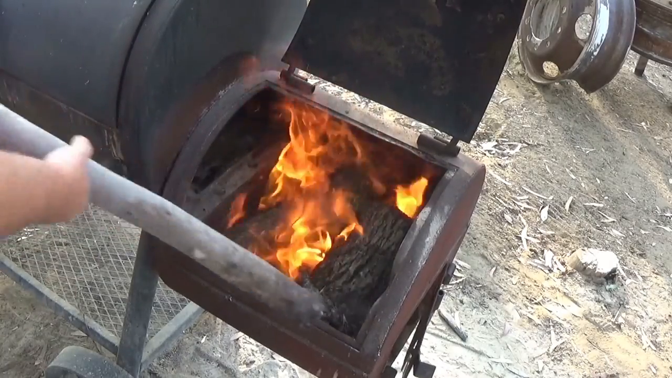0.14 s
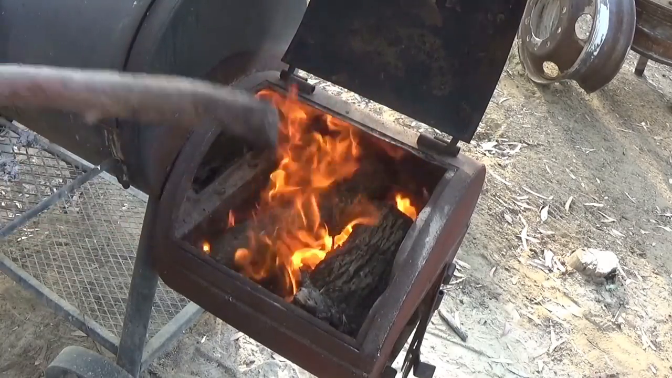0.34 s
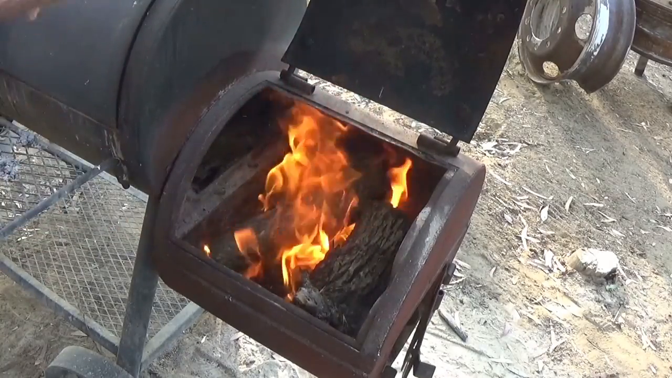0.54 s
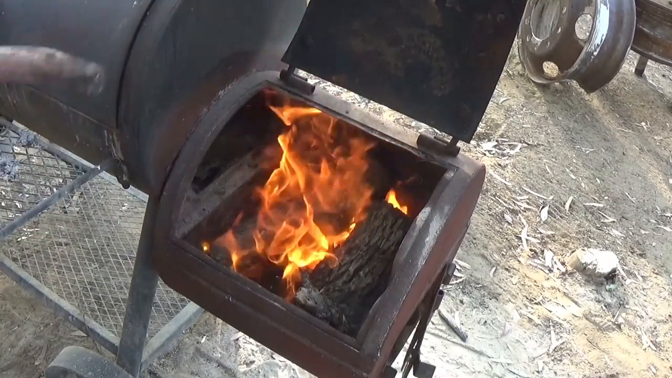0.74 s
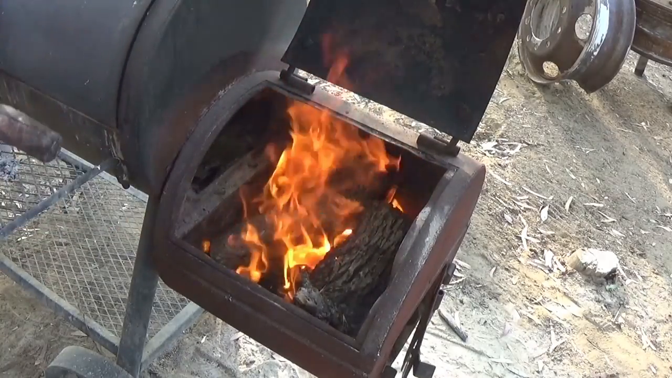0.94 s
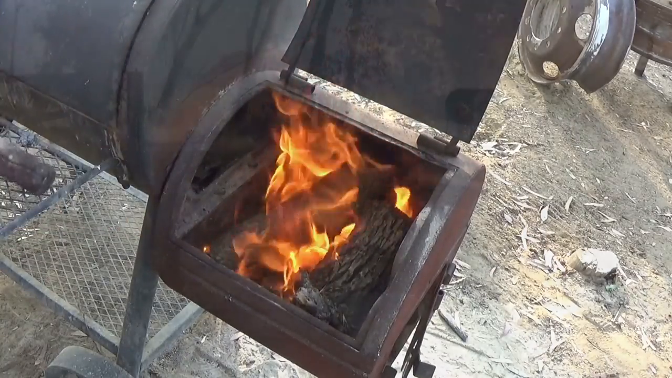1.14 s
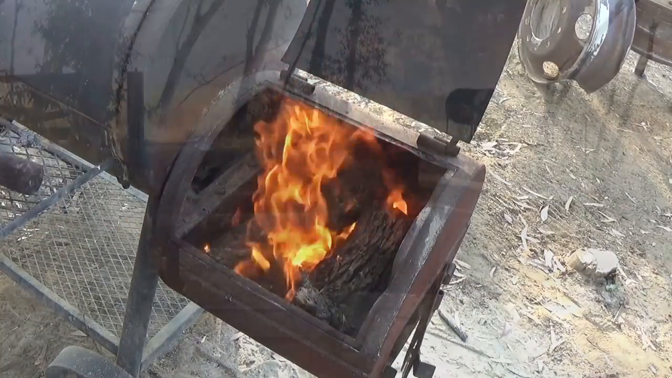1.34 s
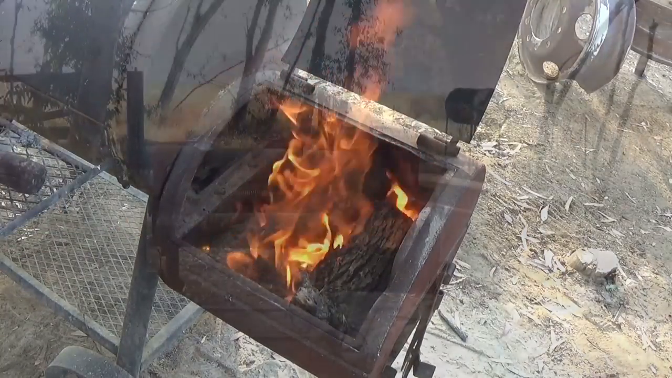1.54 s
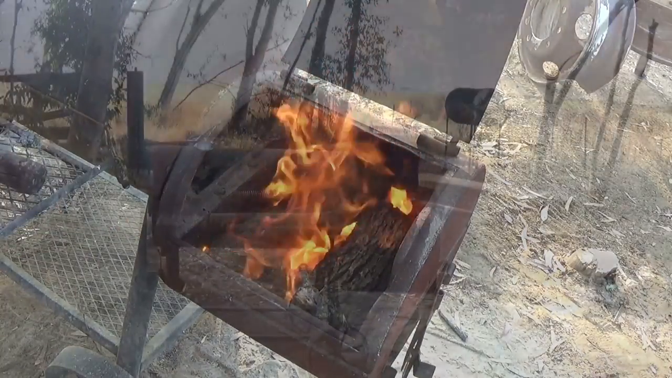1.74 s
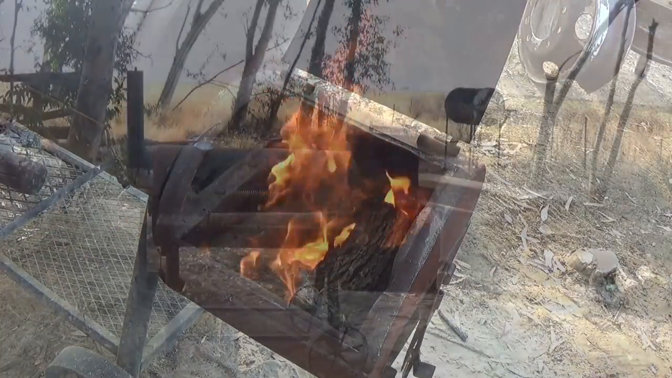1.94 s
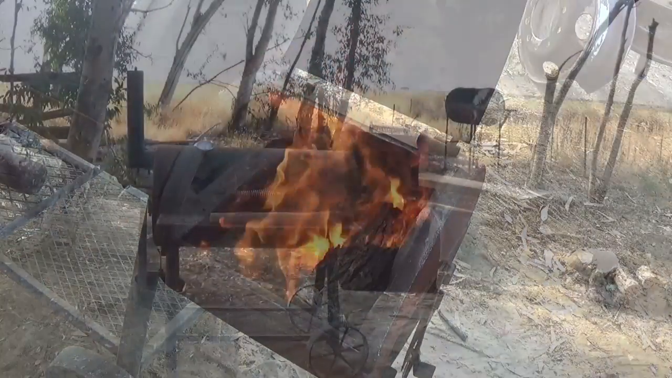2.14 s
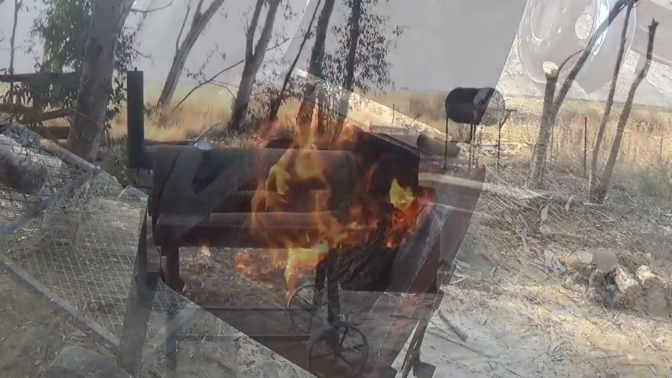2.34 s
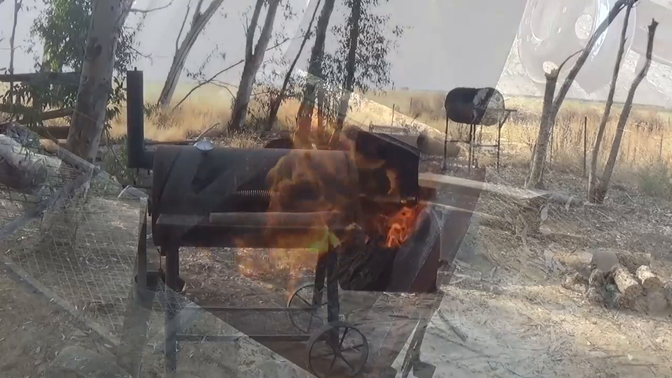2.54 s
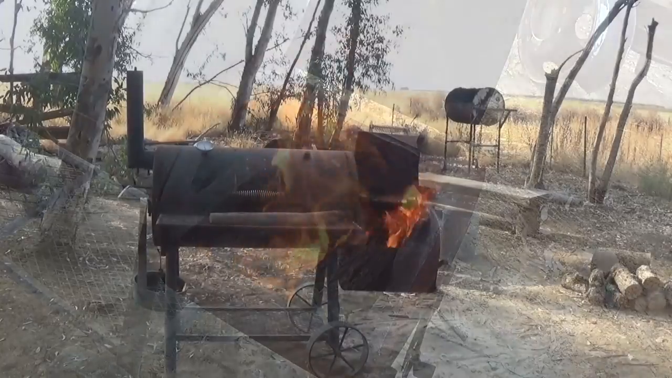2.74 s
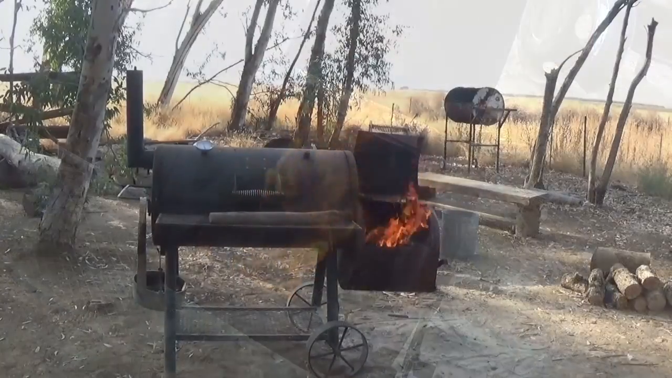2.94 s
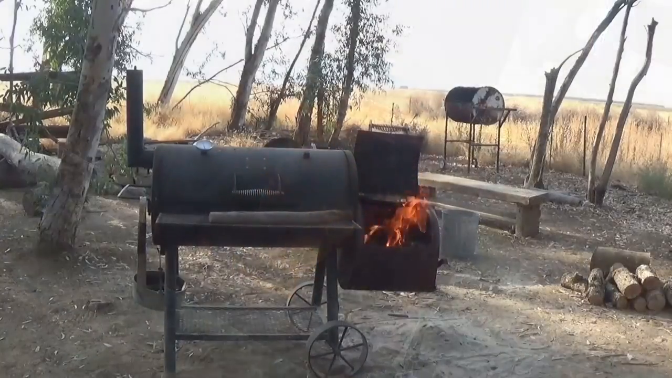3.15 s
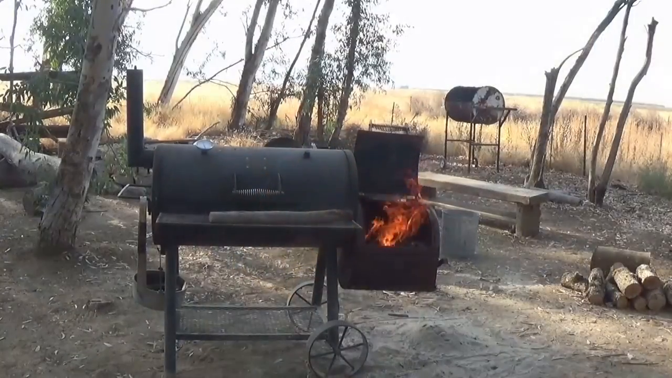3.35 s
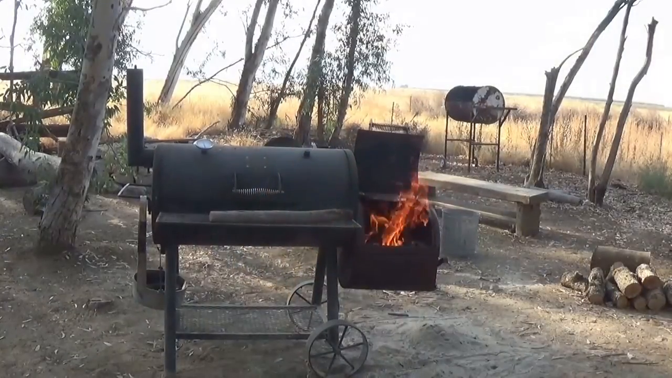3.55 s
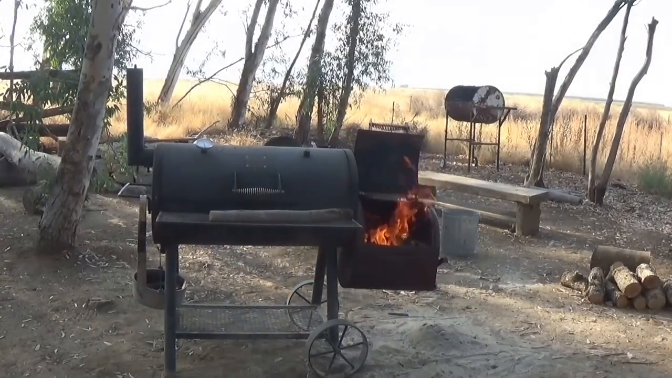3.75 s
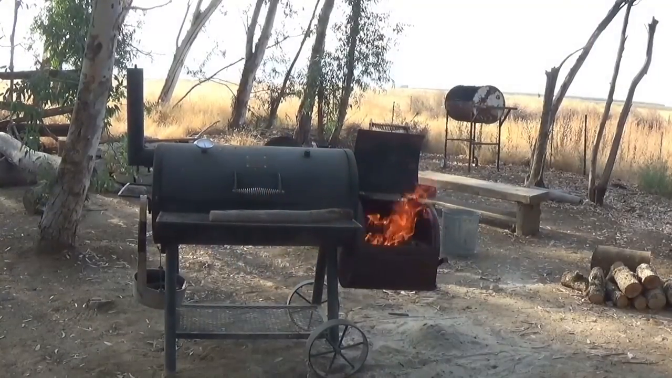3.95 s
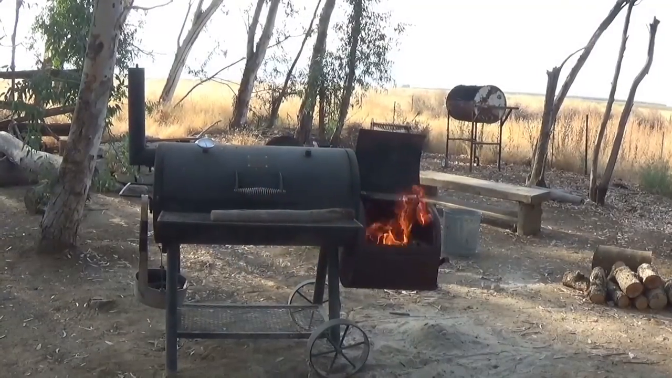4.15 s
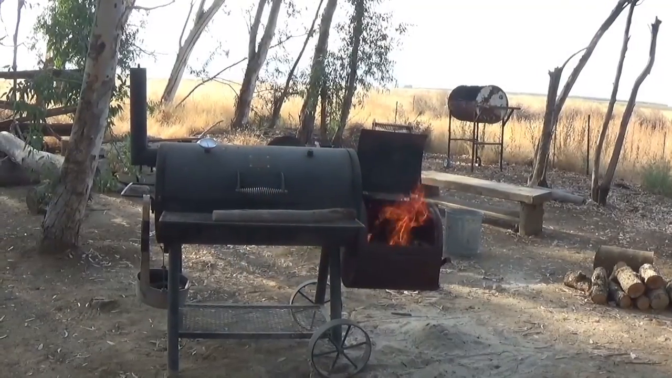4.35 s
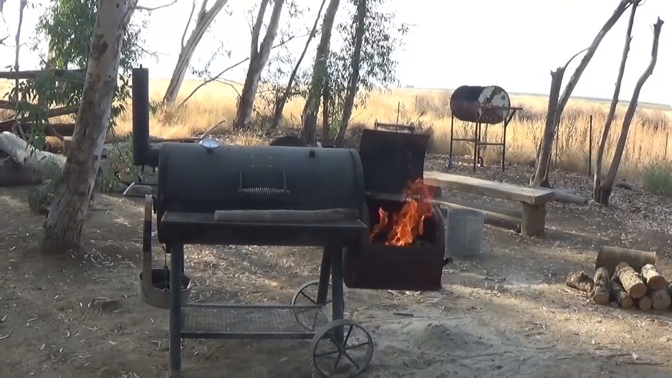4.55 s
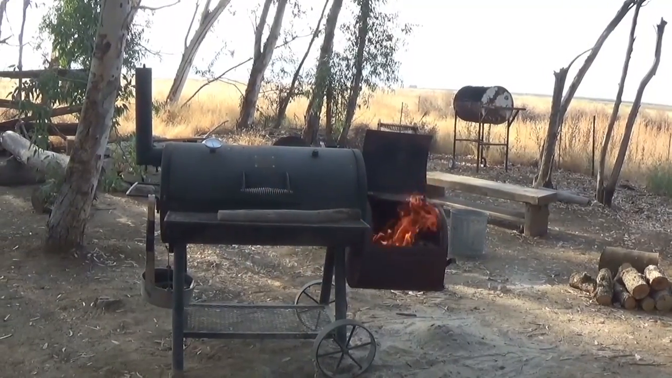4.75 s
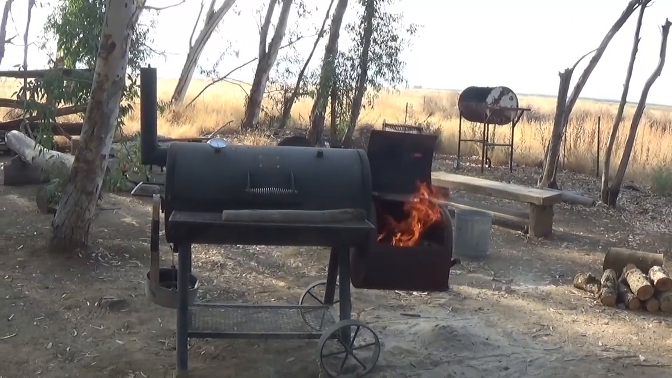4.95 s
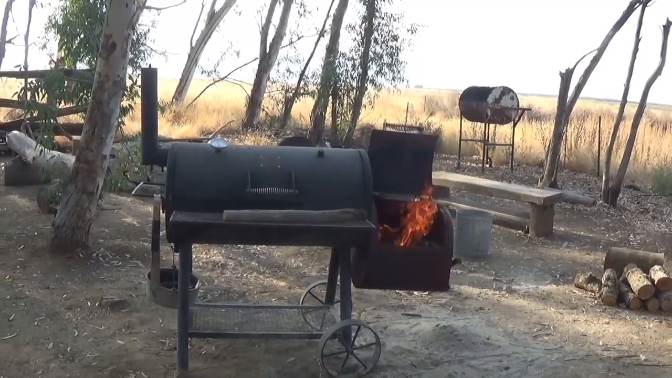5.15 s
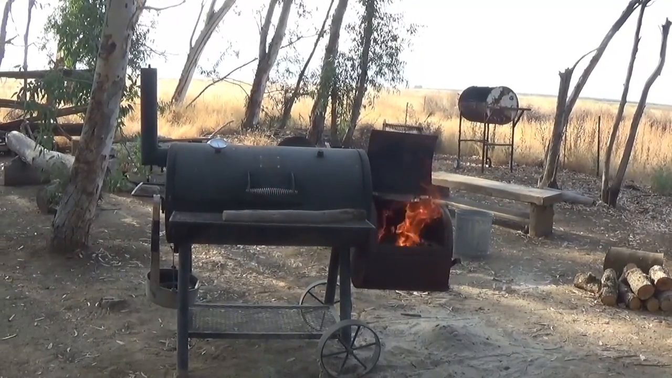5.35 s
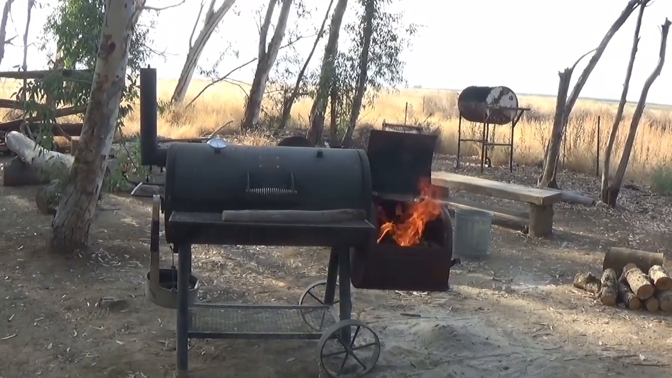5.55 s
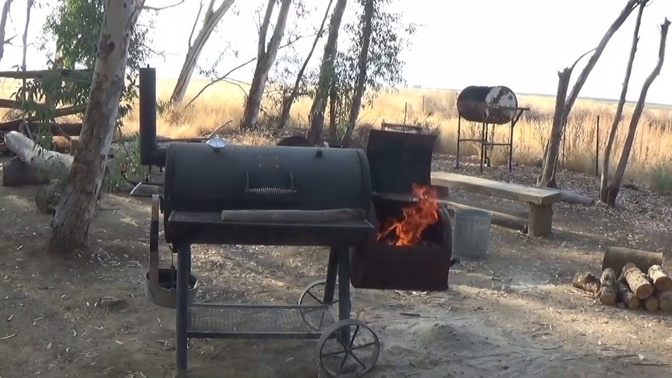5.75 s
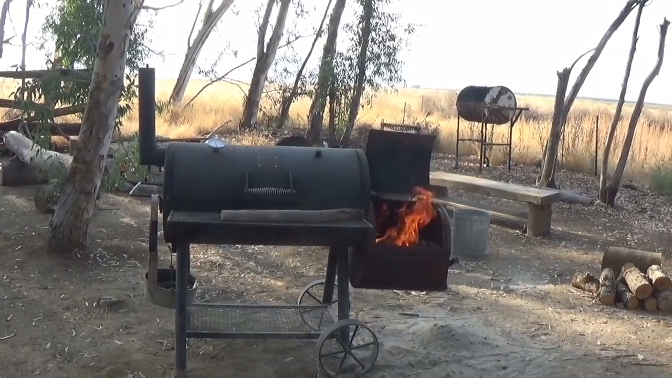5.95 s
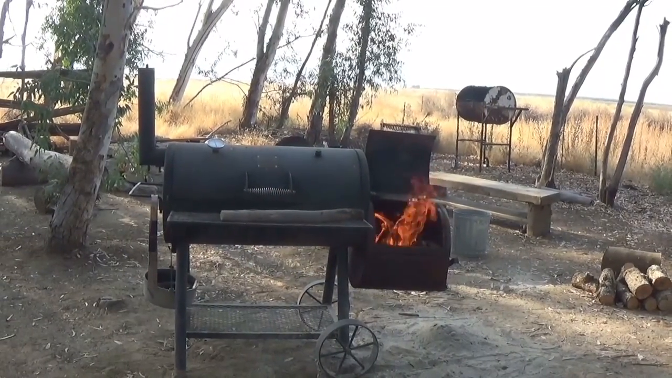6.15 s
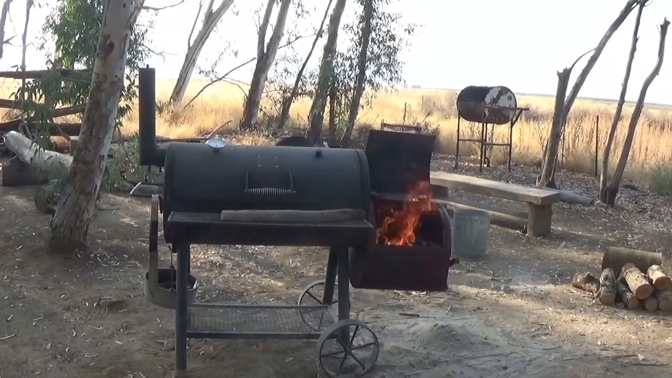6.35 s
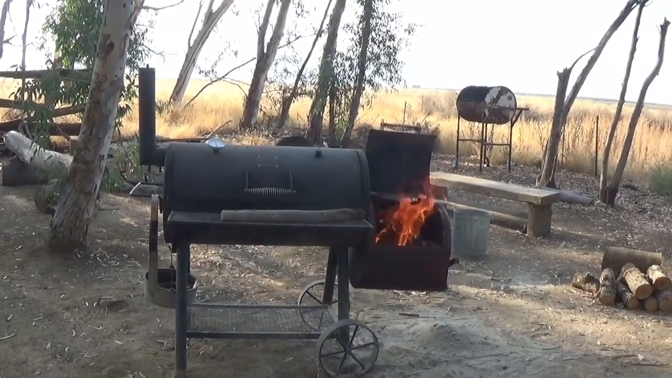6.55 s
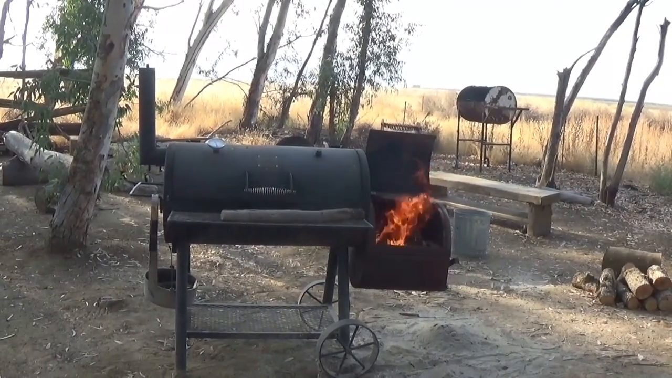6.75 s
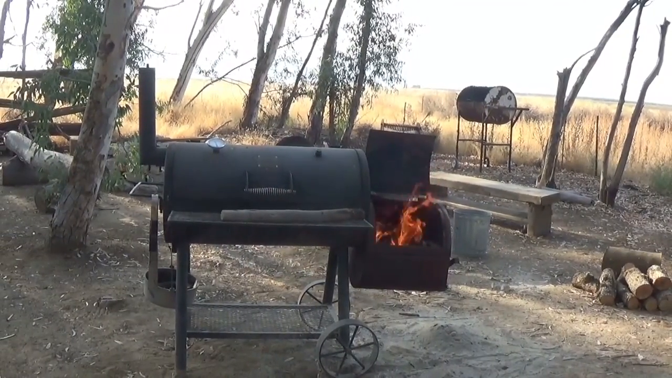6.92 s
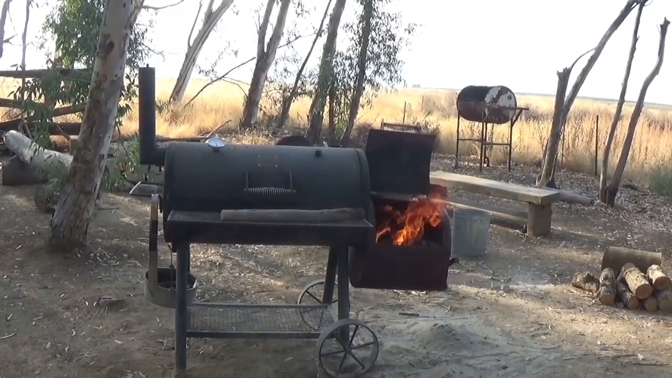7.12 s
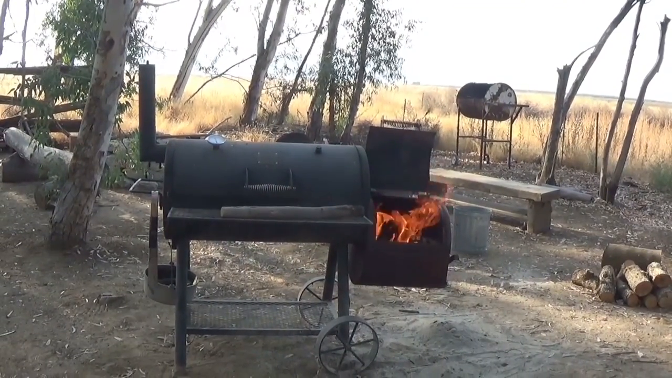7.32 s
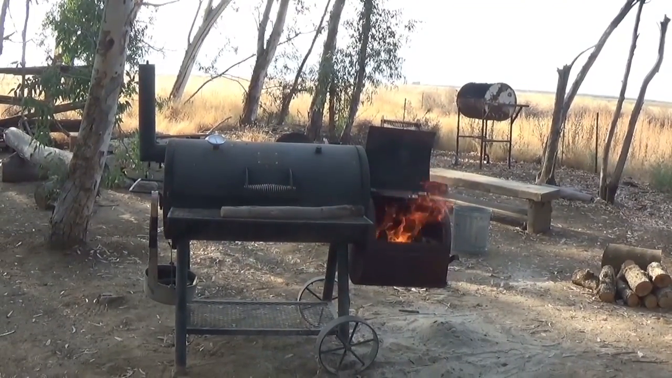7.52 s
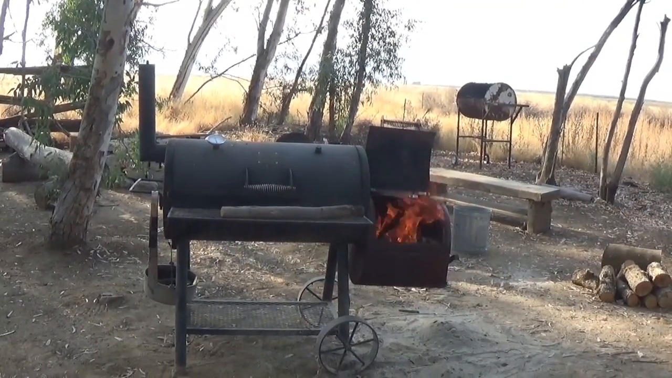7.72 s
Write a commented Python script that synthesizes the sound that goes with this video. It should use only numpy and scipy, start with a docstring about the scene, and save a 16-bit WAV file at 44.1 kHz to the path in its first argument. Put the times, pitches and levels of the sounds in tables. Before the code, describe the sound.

At 0 s a poker strikes logs in a thin steel firebox: one loud, hollow, ringing clang with a rattling second touch, dying within half a second. Fire flares close by, with fine sizzle, a low soft draught and sharp dry snaps. Around 0.3-0.45 s the poker scrapes briefly over the rim, a thin metallic rasp. From 1.07 to 1.45 s comes a second group of quieter, uneven knocks and clatters, strongest near 1.4 s, with a bright crack at 1.6 s. Thin, wavering bird whistles hang behind, with a chip at 0.86 s. The fire sinks until 3 s, then returns only slightly. The quiet open yard remains: soft airy wash, far twittering, a chip at 2.8 s, falling calls around 3.6, 5.1 (clearest), 6.5 and 7.6 s, small peeps, a woody snap at 4.6 s and a crackling cluster with hiss around 7.2-7.3 s.

```python
"""A poker shoves logs about in the steel firebox of a smoker: struck modes boom, chattering contact clatters.
From the start noise sizzles and draws as flames under a soft open wash; gritty noise hisses, wood snaps in cracks.
Gliding tones make birds chip, whistle, call and peep in the trees, over a far twittering flock.
The poker soon drags out over the rim, friction ringing its resonances, and a second group of blows follows.
The fire sinks over the first three seconds and slowly regains some level, snapping on its own among the birds."""
import sys
import numpy as np
from scipy import signal
from scipy.fft import rfft, irfft, next_fast_len
from scipy.io import wavfile
from scipy.ndimage import uniform_filter1d

SR = 44100
rng = np.random.default_rng(int(sys.argv[2]) if len(sys.argv) > 2 else 0)


def to_wav(s):
    """Save 16-bit WAV."""
    ch = np.atleast_2d(s).T  # columns
    pcm = np.round(np.clip(ch, -1, 1) * 32767)  # PCM
    wavfile.write(sys.argv[1], SR, pcm.astype(np.int16))


N = 343098

# how the fire's level sinks and partly returns: time_s, level_db
FIRE_LEVEL = [(0, 3), (1.9, -3), (2.3, -9.5), (3.0, -25), (7.78, -15)]


def amp(db):
    """Amplitude factor of a level in dB."""
    return 10 ** (np.asarray(db) / 20)


def evened(x):
    """Scale to an RMS of one over all channels."""
    return x / np.sqrt(np.mean(x ** 2) + 1e-20)


def read(points, hz):
    """Read a curve of (Hz, value) rows along a logarithmic frequency axis."""
    f, value = np.transpose(points)
    return np.interp(np.log(hz + 1), np.log(f + 1), value)


def level(curve):
    """Gain at every sample from rows of (s, dB)."""
    return amp(np.interp(np.arange(N) / SR, *np.transpose(curve)))


def clock(seconds):
    """Sample times in seconds."""
    return np.arange(int(seconds * SR)) / SR


def add(mix, s, sound):
    """Lay a sound into the mix at s seconds, cut off at the end."""
    part = mix[..., max(round(s * SR), 0):][..., :sound.shape[-1]]
    part += sound[..., :part.shape[-1]]


def colour(x, db_at):
    """Causal (minimum-phase) filter from a function of frequency given in dB."""
    size = 2 * next_fast_len(x.shape[-1] // 2 + 512)
    hz = np.fft.rfftfreq(size, 1 / SR)
    cepstrum = irfft(np.log(amp(db_at(hz)) + 1e-6), size)
    # folding the cepstrum forward makes the response minimum-phase
    cepstrum[1:size // 2] *= 2
    cepstrum[size // 2 + 1:] = 0
    response = np.exp(rfft(cepstrum))
    return irfft(rfft(x, size) * response, size)[..., :x.shape[-1]]


def hump(centre_hz, octaves):
    """A rounded spectral hump with long skirts."""
    def db_at(hz):
        away = (np.log2((hz + 1) / centre_hz) / octaves) ** 2
        return -16 * np.log10(1 + (away + away ** 2) / 2)
    return db_at


def pair(size, spread):
    """Noise at two microphones: a common part and a weaker opposed part."""
    mid, side = rng.standard_normal((2, size))
    return np.array([mid + spread * side, mid - spread * side])


def tail(t60, spread):
    """A dense one-second ring in which each band dies at its own speed."""
    hz, t, z = signal.stft(pair(SR, spread), SR, nperseg=256)
    fading = z * amp(-60 * t / read(t60, hz)[:, None])
    return signal.istft(fading, SR, nperseg=256)[1][:, :SR]


def grains(size, per_s, spread_db):
    """A random train of tiny impacts of uneven strength."""
    strength = amp(spread_db * np.minimum(rng.exponential(1, size), 4))
    struck = rng.random(size) < per_s / SR
    return evened(rng.standard_normal(size) * strength * struck)


def gritty(size, spread, clump_db):
    """Noise of countless small slips that come in clumps about a millisecond long."""
    noise = pair(size, spread)
    clumps = evened(uniform_filter1d(rng.standard_normal(size), size=50))
    return noise * amp(clump_db * clumps)


def firebox():
    """Each blow rings the main modes, and its chattering contact shakes the crowd of weaker ones."""
    # blows: start_s, relative level_db, hardness (-1 soft to 1 sharp),
    # chatter_s (decay time constant), place (0 wall to 1 grate)
    blows = [(0.0, -25, 0.12, 0.0027, 0.012), (.032, -32.5, 0.49, 0.0054, 0.3),
             (0.045, -45, -0.6, 0.005, 0), (1.072, -41, 0.36, 0.0041, 0.91), (1.080, -35, -0.3, 0.004, 1),
             (1.126, -38, 0.34, 0.015, 0.65), (1.189, -43.5, -0.37, 0.042, 0.67),
             (1.282, -41.5, -0.59, 0.02, 0.98), (1.336, -35.5, 0.12, 0.043, 0.99),
             (1.365, -39, -.35, 0.0096, 0.99), (1.386, -31.5, 1, 0.011, 1),
             (1.415, -37.5, -0.75, 0.078, 0.99)]
    # main modes of the steel box: pitch_hz, t60_s, wall_db, grate_db (level when struck there)
    box_modes = [(200, .22, -16, -7), (224, 1.0, -4, -15), (247, .55, -22, 2), (285, .55, -12, -17),
                 (337, .5, -5, -21), (409, .28, -10, -19), (484, .45, -15, -17), (609, .38, 3, -16),
                 (686, .34, -9, -12), (810, .26, -2, -20), (845, .6, -18, -17), (899, .36, 2, -19),
                 (958, .65, -16, -13), (1030, .42, -11, -13), (1149, .45, -7, -15), (1223, .36, -1, -7),
                 (1284, .3, -10, -15), (1430, .33, 2, -4), (1482, .3, -4, -14), (1594, .27, -6, -6),
                 (1648, .3, -9, -15), (1795, .3, -15, -8), (1925, .42, -14, -12), (1970, .36, -14, -14),
                 (2101, .28, -11, -7), (2216, .28, -15, -9), (2388, .42, -20, -15), (3160, .4, -22, -26),
                 (4037, .26, -19, -26)]
    # spectrum of the weaker sheet-steel modes: frequency_hz, wall_db, grate_db (dB per Hz)
    clatter_colour = [(30, -22.5, -41), (129, -19.5, -34), (216, -13, 2), (298, -3, -8.5), (430, -10.5, -6),
                      (654, 3.5, -7.5), (1044, 1, -3), (1406, 2.5, -2), (2000, -9, -1), (3050, -12, -9),
                      (5030, -17, -16), (6900, -22, -28), (10100, -34, -33.5), (15000, -32.5, -44)]
    # how long those weaker modes ring: frequency_hz, t60_s
    clatter_t60 = [(100, 0.16), (250, 0.46), (800, 0.27), (2000, 0.23), (4500, .18), (10000, 0.063)]
    boom_db, hard_boom_db = -3.5, -12  # boom against clatter; its change per unit of hardness
    hard_tilt_db = 2.5  # dB per octave and unit of hardness: hard blows are brighter
    boom_rise = 0.23  # time constant of the boom's build-up, as a share of the chatter time
    settle_db, settle_s = -21.5, 0.2  # logs knocked on the grate go on rattling as they settle

    out, t = np.zeros((2, N)), clock(1)
    hz, t60, wall_db, grate_db = np.transpose(box_modes)[:, :, None]
    # each mode reaches the microphones from its own side: opposite phase shifts in radians
    lag = 0.24 * rng.choice([-1, 1], hz.shape) * np.array([-1, 1])[:, None, None]
    rings = np.sin(2 * np.pi * hz * t + lag) * amp(-60 * t / t60)
    rings *= (-1) ** np.arange(len(box_modes))[:, None]  # neighbouring modes start in opposite directions
    no_deep_bass = signal.butter(3, 150, "high", fs=SR, output="sos")  # the open box holds none
    rings = signal.sosfilt(no_deep_bass, rings)

    for s, db, hardness, chatter, place in blows:
        place = np.clip(place, 0, 1)
        mode_gain = amp(wall_db + place * (grate_db - wall_db))
        boom = (mode_gain * rings).sum(1) * (1 - np.exp(-t / (boom_rise * chatter)))
        add(out, s, amp(db + boom_db + hard_boom_db * hardness) * boom)

        settling = place * amp(settle_db) * np.exp(-t / settle_s)
        contact = grains(len(t), per_s=1100, spread_db=1) * (np.exp(-t / chatter) + settling)
        contact[0] += 0.77 * np.linalg.norm(contact)  # strong first touch
        ring = tail(clatter_t60, spread=0.278)
        ring[:, 0] += 0.75 * np.linalg.norm(ring[0])  # the dry clack of the wood itself
        shaken = signal.fftconvolve(contact[None], ring, axes=1)[:, :SR]
        spectrum = [(f, wall + place * (grate - wall)) for f, wall, grate in clatter_colour]

        def clatter_db(f):
            tilt = hard_tilt_db * hardness * np.log2(np.maximum(f, 300) / 1200)
            return read(spectrum, f) + tilt

        shaken = colour(shaken, clatter_db)
        add(out, s, amp(db) * shaken / shaken[:, :SR // 20].std())  # evened over the first 50 ms
    return out


def fire():
    """Sap sizzles and ticks over the hollow draught of the flames; both begin flared up and calm down."""
    # noise colour of the sizzle: frequency_hz, level_db (per Hz)
    sizzle_colour = [(300, -31.5), (1500, -6), (4000, 2), (7000, -3.5), (10000, -2.5), (12500, -6),
                     (16000, -3.5)]
    # noise colour of the draught: frequency_hz, level_db (per Hz)
    flame_colour = [(30, -23.5), (130, -12.5), (240, 3), (380, -7.5), (1400, -14.5), (3500, -19.5),
                    (7000, -33), (16000, -52)]
    sizzle_db, draught_db = -60, -64  # before the flare and the fire's level curve
    # the first shove stirs the fire up; the extra dB die away with these time constants
    flare_db, sizzle_flare_s, draught_flare_s = 15, .14, .4

    t = np.arange(N) / SR
    ticks = uniform_filter1d(abs(grains(N, per_s=92, spread_db=6.5)), size=50)
    fizz = gritty(N, spread=0.15, clump_db=1.5) * (1 + 0.36 * evened(ticks))
    sizzle = evened(colour(fizz, lambda f: read(sizzle_colour, f)))
    sizzle *= amp(sizzle_db + flare_db * np.exp(-t / sizzle_flare_s))
    draught = evened(colour(pair(N, 0.33), lambda f: read(flame_colour, f)))
    draught *= amp(draught_db + flare_db * np.exp(-t / draught_flare_s))
    return (sizzle + draught) * level(FIRE_LEVEL)


def air():
    """The soft wash of open country: coloured, partly correlated stereo noise that drifts a little in level."""
    # noise colour of the wash: frequency_hz, level_db (per Hz)
    air_colour = [(15, -34), (30, -17.5), (60, -2), (95, -2.5), (130, -3), (190, -0.5), (300, -5.5),
                  (480, -1), (1100, -3.5), (2100, -5.5), (3500, -7), (6400, -14), (10000, -15.5),
                  (15700, -21.5)]
    # left minus right, a faint rumble sits on the right: frequency_hz, difference_db
    lean = [(30, -10.5), (65, 1.5), (130, -1), (1000, 1), (15000, -0.5)]
    # left-right correlation: frequency_hz, likeness (-1 opposed to 1 alike)
    likeness = [(30, -0.75), (70, 1), (150, 1), (400, 0.57), (1000, 0.2), (3000, 0.47), (8000, 0.75),
                (15000, 1)]
    air_db = -62.5

    a, b = rfft(rng.standard_normal((2, N)))
    hz = np.fft.rfftfreq(N, 1 / SR)
    same = np.clip(read(likeness, hz), -1, 1)
    gain = amp(read(air_colour, hz) + np.outer([.5, -.5], read(lean, hz)))
    right = same * a + np.sqrt(1 - same ** 2) * b
    wash = irfft(gain * [a, right], N)

    t = np.arange(N) / SR
    swells = [np.sin(2 * np.pi * (f * t + rng.random())) / np.sqrt(f) for f in np.geomspace(.3, 5, 12)]
    drift = evened(sum(swells))
    return amp(air_db + .5 * drift) * evened(wash)


def rustles():
    """Short gritty hisses: rubbing strokes, and steam escaping just before the wood snaps."""
    # hisses: start_s, length_s, level_db (before the fades), centre_hz
    hisses = [(0.029, 0.011, -30.5, 3400), (0.471, 0.02, -55, 1440), (1.802, 0.11, -46.5, 3300),
              (1.925, 0.041, -57.5, 2190), (2.89, .062, -64, 2280), (7.205, 0.056, -53, 1860),
              (7.256, 0.032, -48, 3140), (7.287, 0.028, -45.5, 2850)]
    out = np.zeros((2, N))
    for s, length, db, centre_hz in hisses:
        size = len(clock(length))
        hiss = colour(gritty(size, spread=0.38, clump_db=3.5), hump(centre_hz, octaves=1.3))
        add(out, s, amp(db) * evened(hiss) * signal.windows.tukey(size, .5))
    return out


def snaps():
    """A gas pocket bursts: a very short crack, a faint echo off the steel, and the knock of the log."""
    # snaps of burning wood: start_s, relative level_db, centre_hz
    timed_snaps = [(0.0333, -21, 9000), (0.056, -33, 9000), (.145, -29.5, 8160), (.719, -40, 8000),
                   (1.386, -23, 4700), (1.472, -38.5, 9800), (1.6409, -21.5, 7300), (1.99, -38, 5050),
                   (2.104, -31.5, 7200), (2.172, -35, 5170), (2.388, -43.5, 2040), (2.426, -42.5, 2500),
                   (2.576, -45, 8800), (3.358, -37, 4840), (4.6202, -26, 3270), (6.097, -47.5, 9020),
                   (7.228, -39.5, 1980), (7.235, -40, 9000), (7.261, -34.5, 8400), (7.274, -26.5, 3230),
                   (7.3036, -31, 3540)]
    # ringing of a split log: pitch_hz, level_db, t60_s
    log_modes = [(910, -7, 0.039), (1023, -7, 0.028), (1340, -6.5, 0.032), (1970, -7.5, 0.019)]
    # time constant of a 5 kHz crack; lower ones, from larger pockets, last longer
    snap_decay_s, decay_power = .0022, 0.29
    # only large, low pockets knock the log strongly
    knock_base_db, knock_below_hz, knock_db_per_octave = -6, 3260, -26
    tick_count, tick_db, tick_hz = 16, -42, 9820  # tiny high snaps, before the nearness offset

    out, t = np.zeros((2, N)), clock(.05)
    knock = sum(amp(db - 60 * t / t60) * np.sin(2 * np.pi * hz * t) for hz, db, t60 in log_modes)
    nearness = level(FIRE_LEVEL)
    # random ticks follow the fire's level by half its dB
    ticks = [(at / SR, tick_db + 10 * np.log10(nearness[at]), tick_hz)
             for at in rng.integers(0, N, tick_count)]
    for s, db, centre_hz in timed_snaps + ticks:
        decay = snap_decay_s * (5000 / centre_hz) ** decay_power
        knock_db = knock_base_db + knock_db_per_octave * max(np.log2(centre_hz / knock_below_hz), 0)
        steel_echo = amp(-39.5) * np.exp(-t / 0.0041)
        shape = (1 - np.exp(-t / 0.00014)) * (np.exp(-t / decay) + steel_echo)
        burst = pair(len(t), 0.21) * shape
        crack = 0.6 * burst.std() * evened(colour(burst, hump(centre_hz, octaves=0.69)))
        add(out, s, amp(db) * (crack + amp(knock_db) * knock))
    no_bass = signal.butter(3, 560, "high", fs=SR, output="sos")  # so small a source radiates none
    return signal.sosfilt(no_bass, out)


def note(length, start_hz, middle_hz, end_hz, db, rough, count=1, taper=1):
    """One bird note of count harmonics: a curved glide whose pitch shakes when it is rough."""
    # throat resonance of the chipping bird: frequency_hz, level_db
    throat = [(1000, -50), (1600, -1.5), (2400, 2.5), (3100, 8), (4600, 2), (5500, -10), (6300, -15),
              (9000, -36)]
    u = np.linspace(0, 1, len(clock(length)))
    hz = np.polyval(np.polyfit([0, .5, 1], [start_hz, middle_hz, end_hz], 2), u)
    shake = evened(uniform_filter1d(rng.standard_normal(len(u)), size=30))
    turns = np.cumsum(hz * (1 + 0.1115 * rough * shake)) / SR
    tone = np.sin(2 * np.pi * turns)
    if count > 1:  # the throat brings out whichever harmonic sweeps through it
        tone = sum(amp(read(throat, k * hz)) * np.sin(2 * np.pi * k * turns) for k in range(1, count + 1))
    return amp(db) * evened(tone) * signal.windows.tukey(len(u), taper) * 0.56


def near_birds():
    """Chips, falling calls, peeps and thin whistles: each kind keeps its own glide and fades."""
    # thin, high, wavering whistles: start_s, length_s, pitch_hz, relative level_db, roughness (0 to 1)
    thin_whistles = [(0.259, 0.32, 6500, -57.5, 0.57), (0.88, 0.43, 6230, -60, 0.6),
                     (1.587, 0.23, 4850, -62, 1), (2.094, 0.42, 5860, -61.5, .65),
                     (2.215, 0.49, 5310, -62.5, 0.99), (4.808, 0.11, 4600, -68, 0.3),
                     (7.322, .48, 7250, -68, 0.8)]
    # harmonic alarm chips: start_s, length_s, start_hz, middle_hz, end_hz, relative level_db,
    # roughness (0 to 1)
    chips = [(0.856, 0.025, 997, 1546, 890, -38, 0), (2.793, .042, 1398, 1846, 1196, -44.5, 1)]
    # short peeps that end higher than they start: start_s, relative level_db, middle_hz
    peeps = [(2.76, -58.5, 2680), (6.688, -58.5, 3650), (6.835, -66, 2350), (7.44, -59, 3560),
             (7.676, -62, 3600)]
    # one bird's falling call: start_s, relative level_db, middle_hz
    falls = [(3.592, -55.5, 2850), (4.706, -63.5, 2870), (5.094, -49.5, 2800), (6.43, -56.5, 2670),
             (6.545, -54, 2900), (7.58, -61.5, 2820)]

    out = np.zeros(N)
    for s, length, hz, db, rough in thin_whistles:
        add(out, s, note(length, hz, hz, hz, db, rough, taper=0.49))
    for s, *call in chips:
        add(out, s, note(*call, count=5, taper=0.65))
    for s, db, hz in peeps:
        add(out, s, note(0.074, hz * .92, hz, hz * 1.05, db, rough=0.2, taper=0.47))
    for s, db, hz in falls:
        add(out, s, note(.08, hz * 1.13, hz, hz * .8, db, rough=0.16, taper=0.58))
    return out


def flock():
    """Far birds twitter in runs of upward sweeps, with stray notes at random moments."""
    # twitters: start_s (middle of the first sweep), relative level_db of a sweep, middle_hz
    twitters = [(3.225, -72, 3790), (4.157, -72, 4130), (4.219, -67, 3585), (4.43, -72, 4100),
                (5.695, -65.5, 3350), (5.859, -64.5, 3660), (6.448, -69, 4070), (7.352, -65, 3440)]
    twitter_s, sweeps_per_s, sweep_s = .115, 85, 0.059  # the sweeps overlap
    pitch_spread, sweep_rise = 0.31, 0.0994  # each way, as shares of the pitch
    stray_count, stray_db, stray_low_hz, stray_high_hz = 130, -71.5, 2526, 4970  # middle pitches

    out = np.zeros(N)
    for s, db, middle_hz in twitters:
        starts = np.arange(s, s + twitter_s, 1 / sweeps_per_s) - sweep_s / 2
        offsets = rng.permutation(np.linspace(-1, 1, len(starts)))
        pitches = middle_hz * (1 + pitch_spread * offsets)
        for start, hz in zip(starts, pitches):
            sweep = note(sweep_s, hz * (1 - sweep_rise), hz, hz * (1 + sweep_rise), db, rough=0.19)
            add(out, start, sweep)
    for when, length, pitch, glide in rng.random((stray_count, 4)):
        hz = stray_low_hz + (stray_high_hz - stray_low_hz) * pitch
        start_hz, end_hz = hz * (0.92 + 0.36 * glide), hz * (1.1 - 0.268 * glide)  # rising to falling
        stray = note(0.057 + 0.063 * length, start_hz, hz, end_hz, stray_db, rough=0.21)
        add(out, when * N / SR, stray)
    return out


def birds():
    """Near calls and a far twittering flock, both echoing among the trees."""
    # how long the trees echo: frequency_hz, t60_s
    yard_t60 = [(200, 0.24), (3000, 0.57), (10000, 0.1)]
    near_echo_db, far_echo_db = -6, 3  # echo against the direct sound
    near, far = near_birds(), flock()
    trees = tail(yard_t60, spread=0.7)
    trees = trees / np.linalg.norm(trees[0])
    sent = amp(near_echo_db) * near + amp(far_echo_db) * far
    echo = signal.fftconvolve(sent[None], trees, axes=1)[:, :N]
    return near + far + echo


def drag():
    """The poker drags over the rim as it is drawn out: fine friction grains excite its resonances."""
    # loudness of the stroke: time_s, level_db (relative)
    drag_level = [(0, -75), (.17, -77), (.27, -54.5), (.34, -54.5), (.39, -46), (.43, -53.5), (.46, -78),
                  (.6, -110)]
    # resonances of the poker: pitch_hz, width_octaves, level_db
    poker = [(1187, 0.09, 5.5), (2270, 0.09, 4), (3170, 0.095, 5.5), (4460, 0.038, 6), (5530, 0.1, -1.5),
             (7900, 0.12, -7.5), (10000, 0.45, -11)]
    ring = sum(amp(db) * colour(gritty(SR, spread=.25, clump_db=2.0), hump(hz, octaves))
               for hz, octaves, db in poker)
    return np.pad(evened(ring), ((0, 0), (0, N - SR))) * level(drag_level)


def scene():
    """Sources in front of a microphone pair, their stereo width shaped by frequency, and the air around."""
    # microphone response to sound from the front: frequency_hz, gain_db
    microphone = [(30, 4.5), (6000, -0.5), (8500, -1.5), (10400, 3), (12300, -5), (15500, -9)]
    # gain of the left-right difference: frequency_hz, gain_db
    width = [(30, 13.5), (70, 2), (150, -9), (260, -11), (500, 0.5), (1000, 3), (3000, 0), (8000, 1.5),
             (13000, -6)]
    sources = firebox() + drag() + rustles() + snaps() + fire() + birds()
    front = colour(sources, lambda f: read(microphone, f))
    side = colour((front[0] - front[1]) / 2, lambda f: read(width, f))
    stereo = front.mean(0) + np.array([side, -side])
    return stereo * amp([[.7], [-.7]]) + air()  # the sources lean slightly left


def record(dry):
    """Band limit: a steep linear-phase low-pass closes off the highest treble."""
    low_pass = signal.firwin(511, 15800, window=("kaiser", 9), fs=SR)  # cutoff in Hz
    return signal.oaconvolve(dry, low_pass[None], "same")


dry = scene()
out = record(dry)
to_wav(out)
```